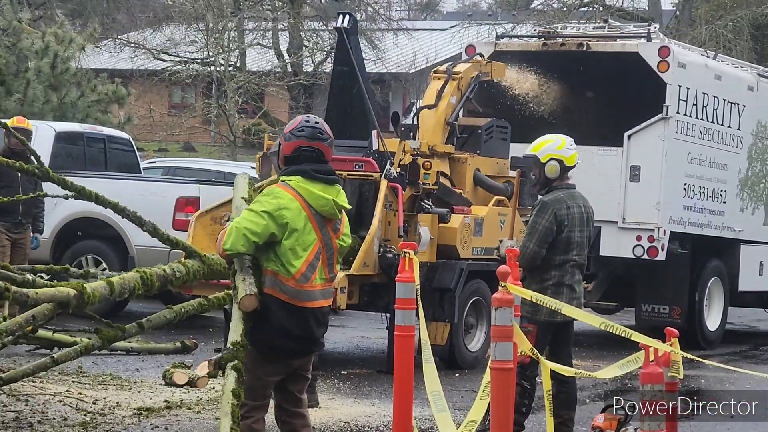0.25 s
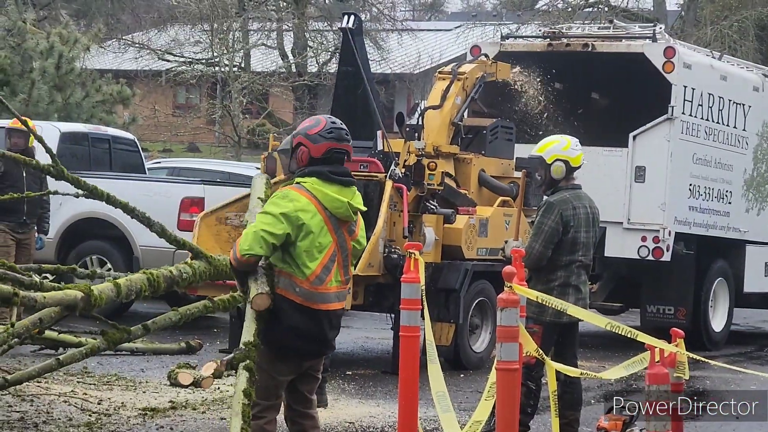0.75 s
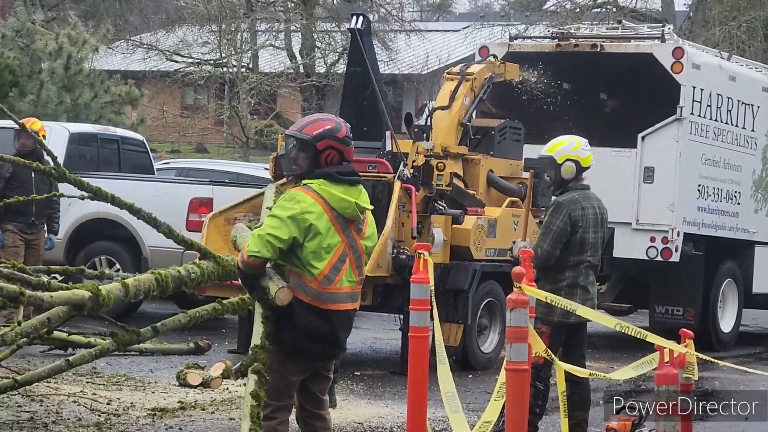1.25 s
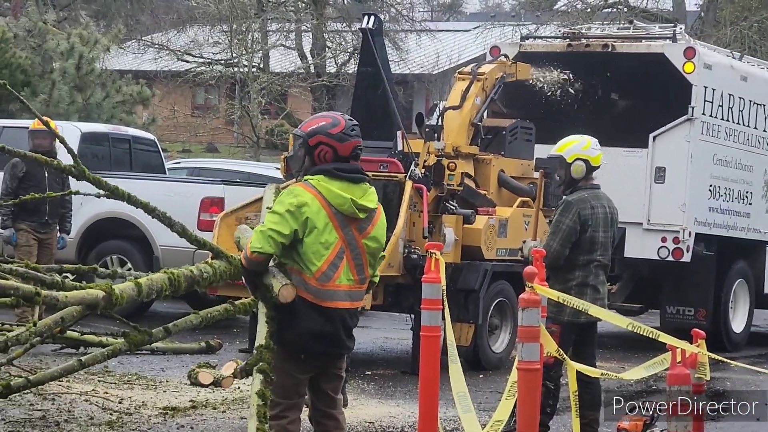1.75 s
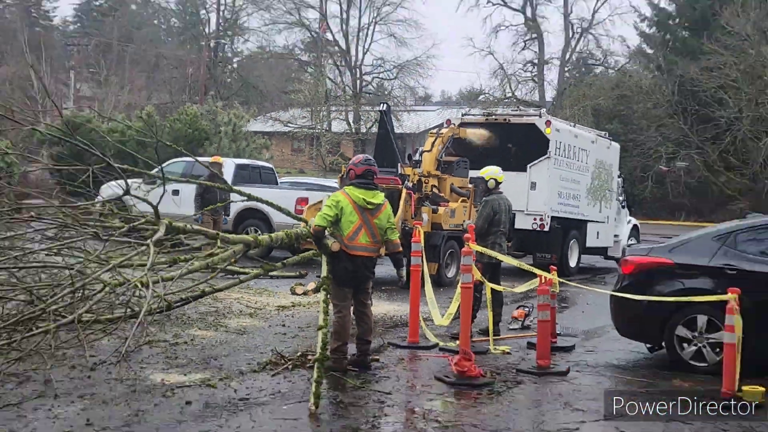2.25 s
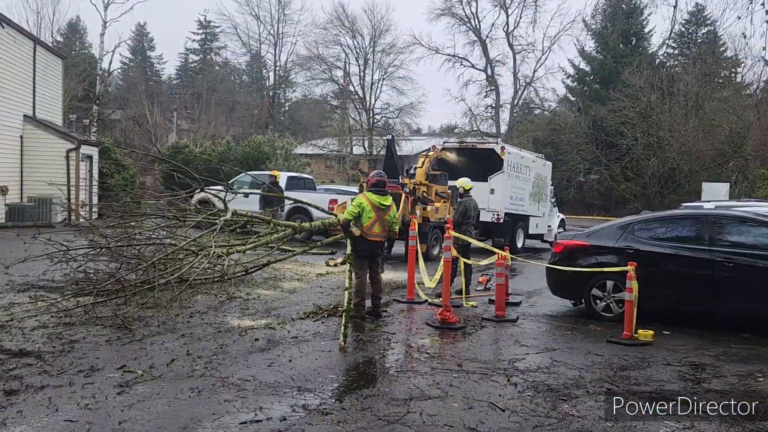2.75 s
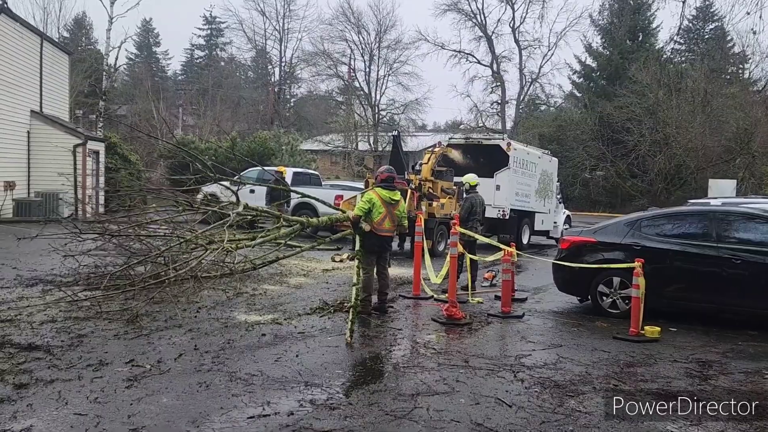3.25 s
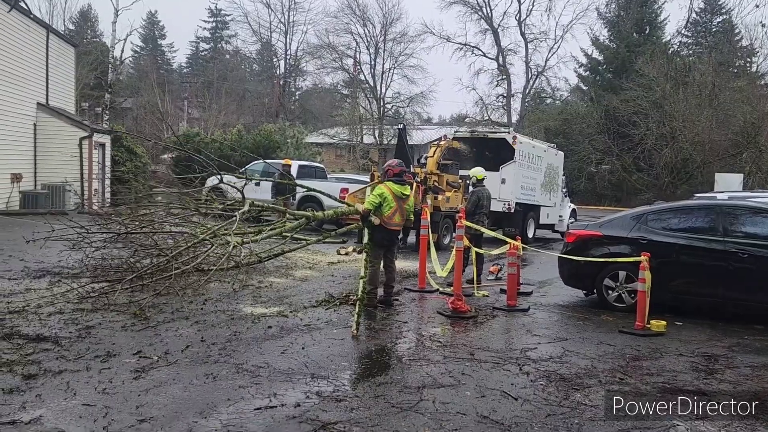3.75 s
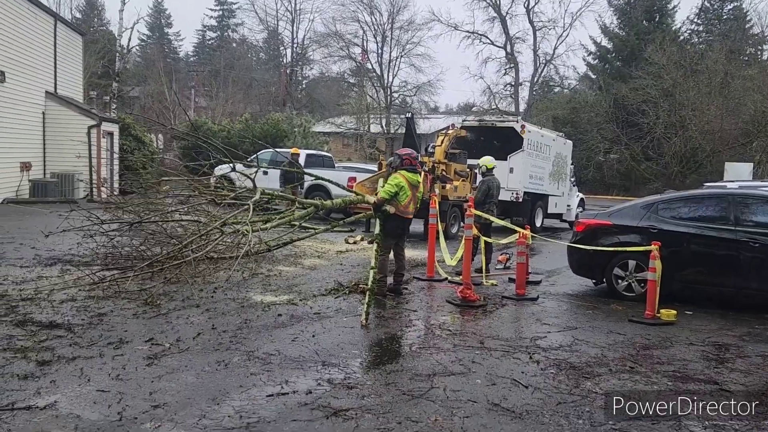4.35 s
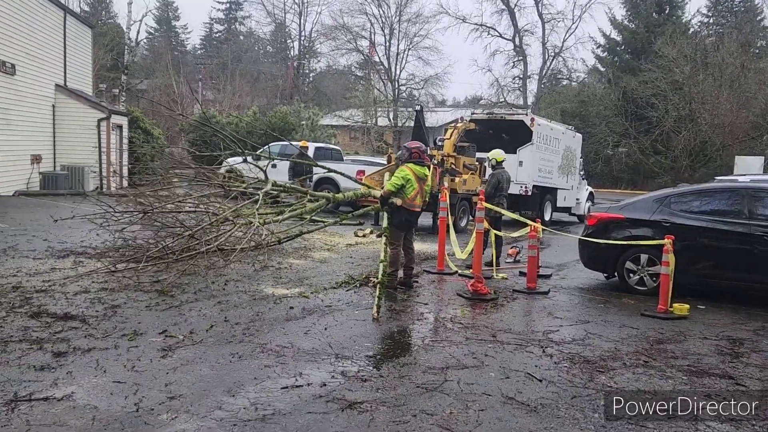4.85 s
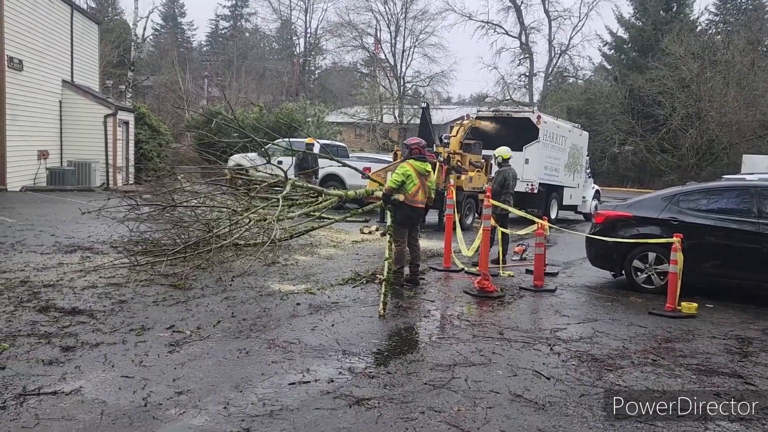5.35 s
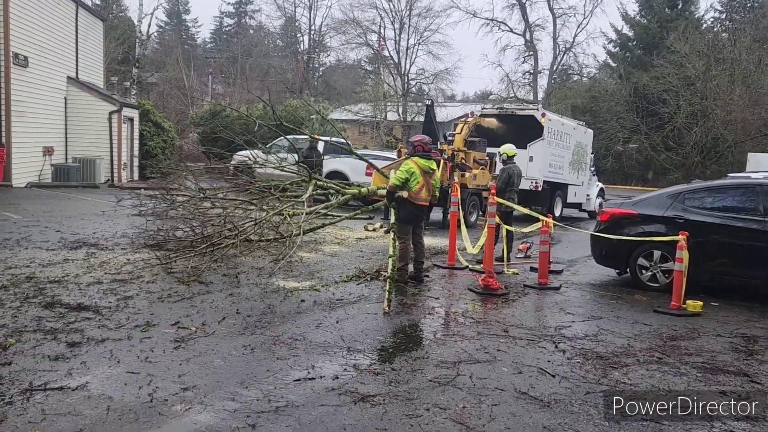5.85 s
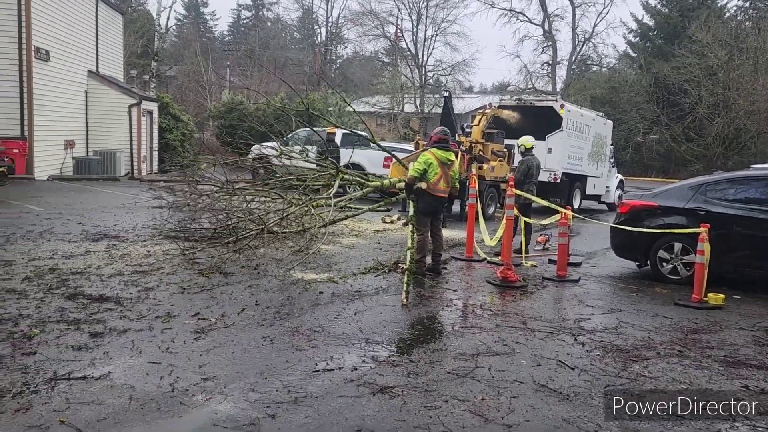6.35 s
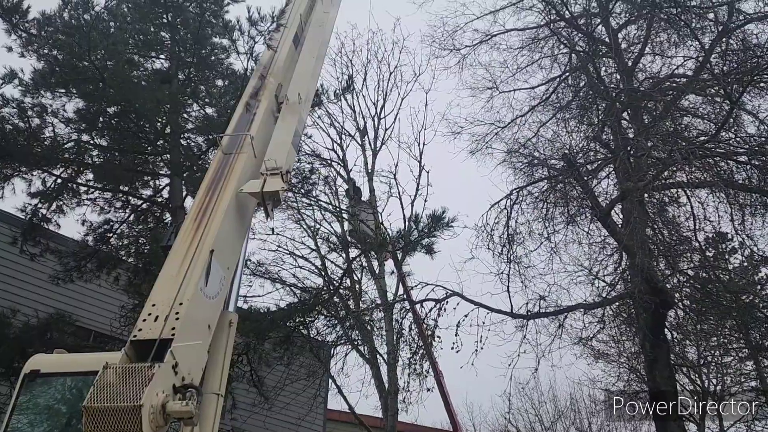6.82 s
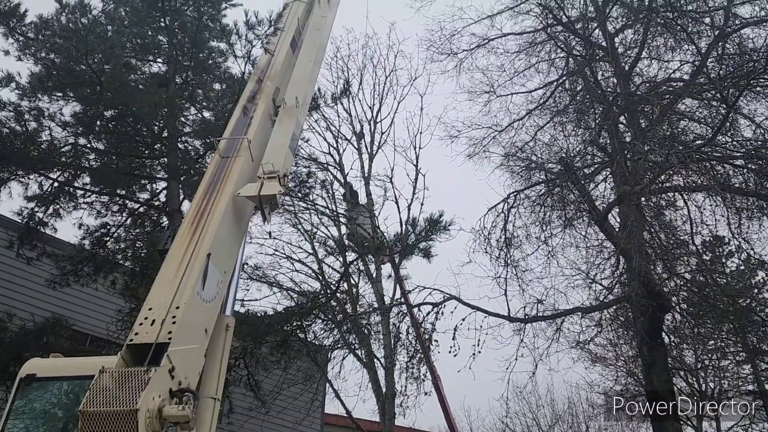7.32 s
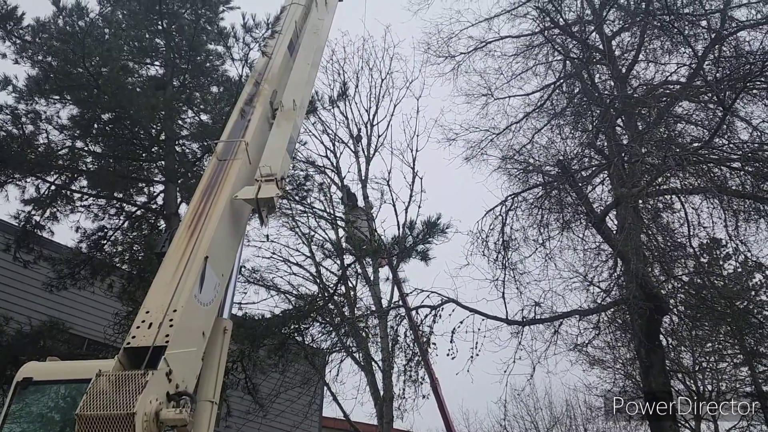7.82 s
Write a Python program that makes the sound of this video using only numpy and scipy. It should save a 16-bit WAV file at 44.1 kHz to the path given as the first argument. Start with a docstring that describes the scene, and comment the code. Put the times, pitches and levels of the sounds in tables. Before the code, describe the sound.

A close wood chipper is already biting a branch at 0 s, its droning engine near 46 Hz dipping slightly, then climbing steadily to about 59 Hz by 2.2 s. Short sticks buzz through, chips patter into the truck, and twigs crack, most sharply at 1.25 s, with small hollow log knocks at 0.64 and 1.25 s. Around 2.15-2.4 s the sound steps back to the open yard. A thick branch hits at 2.3 s: a hard rasping growl and bright splintering as the pitch sags until 3.1 s, then recovers, with snaps near 3.7 and 4.1 s. Another bite at 5.1 s drags it down until 6.4 s. It cuts at 6.57 s to 60 ms of silence. From 6.63 to 8 s a crane diesel runs close, slightly right, firing near 60 Hz, with block ringing strongest at first, clatter, low rumble and high hiss swelling around 6.65, 7.05 and 7.9 s.

```python
"""A drum chipper, already biting into a branch, gathers speed, then sags and recovers as more branches follow.
Engine orders drone and lope; knife blows ring the drum, noise bands rasp, splinter and spray into a truck,
and twigs snap. The sound starts close and widens to the yard at about 2.3 s. After a 60 ms silence a crane's
diesel knocks close by, off to the right: firing orders, a ringing block, clatter, rumble and swelling hiss."""
import sys
import numpy as np
from scipy import signal
from scipy.fft import rfft, irfft, next_fast_len
from scipy.io import wavfile

SR = 44100
rng = np.random.default_rng(int(sys.argv[2]) if len(sys.argv) > 2 else 0)


def digitize_waveform(pressure):
    """Quantize a signal to 16-bit integers and store it at the path in sys.argv[1].

    Rows of a 2-D input are taken as channels; values are limited to [-1, 1].
    """
    field = np.atleast_2d(pressure).T
    bounded = np.clip(field, -1, 1)
    quanta = np.round(bounded * 32767).astype(np.int16)
    wavfile.write(sys.argv[1], SR, quanta)


N = 356328
TIME = np.arange(N) / SR
CHIPPER_END_S, CRANE_START_S = 6.567, 6.627

# likeness of the two ears in the yard: (f/Hz, likeness 0-1)
YARD_LIKENESS = [(130, .99), (290, 0.97), (640, 0.47), (1400, 0.03), (15000, 0.16)]
# likeness of the two ears beside the crane: (f/Hz, likeness 0-1)
CRANE_LIKENESS = [(60, 0.96), (130, 1), (300, 0.29), (700, 1), (1400, 0.81), (3000, 0.26), (15000, 0.14)]


def chipper():
    """Engine and drum turn together; each knife blow thumps the drum, splits wood and flings chips."""
    # shaft speed, sagging in each cut and recovering after it: (t/s, f/Hz)
    shaft_speed = [(0, 47.32), (0.12, 45.87), (0.27, 45.42), (0.65, 48.71), (1.3, 53.6), (2, 58.06),
                   (2.19, 59.06), (2.3, 58.13), (2.75, 50.6), (3.1, 45.75), (3.95, 52.1), (4.65, 57.18),
                   (5.07, 59.5), (5.3, 56.2), (5.75, 51.6), (6.4, 45.8), (6.56, 46.65)]
    # tilt between the ears: (f/Hz, left minus right level/dB)
    yard_balance = [(60, 0.5), (110, 0.0), (200, 0.0), (380, 1), (700, 1.5), (1290, 2), (2380, 1.5),
                    (4400, -3.5), (8120, 7), (15000, 3)]
    # knife blows: (free level/dB, rise/(dB/Hz), steady cut level/dB, first bite level/dB, close gain/dB)
    knife_levels = (-34, 0.46, -24.5, -17, 5)
    # splitting wood: (free level/dB, rise/(dB/Hz), steady cut level/dB, first bite level/dB, close gain/dB)
    splinter_levels = (-40.5, 0.06, -36.5, -26.5, 6)
    widen_from_s, widen_to_s = 2.15, 2.38
    speed_hz, = curves(shaft_speed)
    turns = np.cumsum(speed_hz) / SR
    # 1 while the microphone is aimed closely at the chipper, 0 once it takes in the yard
    close = np.clip((widen_to_s - TIME) / (widen_to_s - widen_from_s), 0, 1)
    load, _, boom_change_db = branches()
    stick_knife, stick_splinter, stick_spray = sticks()
    knife = effort(knife_levels, speed_hz, close, stick_knife)
    splinter = effort(splinter_levels, speed_hz, close, stick_splinter)
    # the knives meet the wood at uneven moments
    clicks, bite = strokes(turns + .009 * wander(55), uneven_db=3.5, scatter_db=1.4, decay_s=.008)
    machine = engine_drone(speed_hz, turns, load, close) + engine_lope(speed_hz, turns, close)
    machine = machine + deep_boom(boom_change_db, close) + housing_rumble(speed_hz, close)
    machine = machine + drum_growl(clicks, knife) + whistle(speed_hz, load, close)
    wood = cutting_rasp(bite, knife) + splitting(bite, splinter) + hood_knocks(splinter)
    wood = wood + chip_spray(speed_hz, close, stick_spray) + snaps() + log_knocks()
    return place(machine + wood, yard_balance)


def engine_drone(speed_hz, turns, load, close):
    """Each shaft order swells and fades as it glides through the standing waves of pipe and yard."""
    # standing waves: (f/Hz, level/dB)
    pipe_waves = [(46, -30.5), (53, -39), (56, -36), (60, -29), (91, -20), (94.5, -34.5), (104, -22),
                  (110.5, -36), (116, -21), (137, -25.5), (145, -21.5), (155, -23.5), (160, -35),
                  (166, -23.5), (176, -23), (192, -31.5), (220, -19.5), (236, -22.5), (258, -21.5),
                  (280, -29.5), (296, -29.5)]
    # shaft orders 1 to 5: (level re standing wave/dB, change per unit load/dB, close gain/dB)
    shaft_orders = [(1.5, -13, 1), (-2, 0.5, 7), (-0.5, 0.5, 6), (1.5, 2, 2), (-2.5, 1, -2)]
    wave_hz, wave_db = np.transpose(pipe_waves)
    orders_db = []
    for k, (db, load_db, close_db) in enumerate(shaft_orders, 1):
        standing_db = np.interp(k * speed_hz, wave_hz, wave_db)
        orders_db.append(standing_db + db + load_db * load + close_db * close)
    return exhaust(turns, orders_db, flutter_db=1.1, flutter_rate=18, lag_turns=.03)


def engine_lope(speed_hz, turns, close):
    """Unequal knife cuts make the engine lope under load, heard as fluttering half orders of the shaft."""
    # half orders: (shaft order, relative level/dB)
    half_orders = [(2.5, -3), (3.5, -5.5), (4.5, -5.5), (5.5, -15.5), (6.5, -27)]
    # lope: (free level/dB, rise/(dB/Hz), steady cut level/dB, first bite level/dB, close gain/dB)
    lope_levels = (-48, 3, -25.5, -37, 4.5)
    tones = 0
    for order, db in half_orders:
        phase = 2 * np.pi * (order * turns + rng.random())
        tones = tones + undb(db + 5.4 * wander(13)) * np.sin(phase)
    return effort(lope_levels, speed_hz, close) * np.sqrt(2) * tones


def deep_boom(change_db, close):
    """Low noise in resonant bands, which dips while a branch is cut and is stronger close up."""
    # boom spectrum: (f/Hz, level/dB)
    boom_bands = [(18, -71), (30, -41), (42, -13), (56, -18), (69, 1), (84, -8), (110, -6.5), (170, -60)]
    return undb(-28.5 + change_db + 6 * close) * tint(YARD_LIKENESS, boom_bands)


def housing_rumble(speed_hz, close):
    """The housing rumbles as a low-mid noise band that grows with the work."""
    # housing spectrum: (f/Hz, level/dB)
    housing_bands = [(55, -27), (90, -5.5), (130, 8), (190, 5.5), (260, -1), (340, -5.5), (600, -51.5)]
    # housing, trimmed below: (free level/dB, rise/(dB/Hz), steady cut level/dB, first bite level/dB, close gain/dB)
    housing_levels = (-19, 0.02, -23, -12, 4.5)
    return undb(-6.5) * effort(housing_levels, speed_hz, close) * tint(YARD_LIKENESS, housing_bands)


def drum_growl(clicks, knife):
    """Knife blows ring the steel drum and run together into a growl."""
    # drum spectrum: (f/Hz, level/dB)
    drum_bands = [(20, -85), (70, -46), (130, 8.5), (220, 4), (320, -2), (430, 1), (560, -5.5), (780, -5),
                  (950, -12), (1400, -42)]
    return undb(2.5) * knife * ring(clicks, drum_bands, .017, YARD_LIKENESS)


def cutting_rasp(bite, knife):
    """The cut itself rasps: noise that surges with each knife blow over a steady floor."""
    # cutting spectrum: (f/Hz, level/dB)
    cutting_bands = [(180, -16.5), (300, -0.5), (376, -7.5), (431, 0), (630, -7), (791, -7.5),
                     (1100, -15.5), (1300, -12.5), (1690, -45.5), (2860, -120)]
    return undb(-4) * knife * tint(YARD_LIKENESS, cutting_bands, bite + 2)


def splitting(bite, splinter):
    """Wood splits in ragged bursts: bright noise pulsed by the blows and roughened at random."""
    # splintering spectrum: (f/Hz, level/dB)
    splinter_bands = [(560, -23.5), (950, -3), (1150, -8), (1450, 0.5), (1740, -4), (2020, -1.5),
                      (2340, -4), (2540, -7.5), (3020, -7.5), (3230, -11), (3510, -7), (3760, -17.5),
                      (4200, -14), (5460, -32), (9240, -120)]
    ragged = (bite + 7) * undb(0.36 * wander(160) + 0.3 * wander(30))
    return undb(3.5) * splinter * tint(YARD_LIKENESS, splinter_bands, ragged)


def hood_knocks(splinter, rate=280, scatter_db=2, size=4096):
    """Lumps of wood hit the hood at random; each hit wakes its resonances in a different mix."""
    # resonances of the steel hood: (f/Hz, width/Hz, level/dB)
    hood_modes = [(1458, 102, 3), (1740, 210, -12), (2325, 12, 0.5), (2700, 41, -19), (3050, 14, -0.5),
                  (3520, 185, -6), (4100, 93, -5), (4840, 120, -6.5)]
    strengths = undb(scatter_db * np.clip(rng.standard_normal(N), -2, 1))
    hits = (rng.random(N) < rate / SR) * strengths
    out, t = 0, TIME[:size]
    for hz, width_hz, db in hood_modes:
        mode = np.exp(-np.pi * width_hz * t) * np.sin(2 * np.pi * (hz * t + rng.random((2, 1))))
        mixed_hits = hits * (rng.random(N) - .5)
        rung = signal.oaconvolve([mixed_hits], mode, axes=1)[:, :N]
        out = out + undb(db) * np.sqrt(width_hz) * unit(rung)
    return undb(-3.5) * splinter * unit(out)


def chip_spray(speed_hz, close, stick_spray):
    """Chips patter densely on the truck's box: high noise with fast random flicker, late by their flight."""
    # spray spectrum: (f/Hz, level/dB)
    spray_bands = [(1760, -11.5), (3000, -6), (3190, -6.5), (3830, -1), (4220, 1.5), (5120, 0), (5380, 3),
                   (5850, 0), (7410, 1), (8630, -3.5), (9780, -17), (11700, -10.5), (14600, -13),
                   (15400, -38), (15800, -19)]
    # spray: (free level/dB, rise/(dB/Hz), steady cut level/dB, first bite level/dB, close gain/dB)
    spray_levels = (-41.5, -0.15, -31.5, -32, 2.5)
    # the flight delays the chips of branches only
    chips = effort(spray_levels, speed_hz, close, stick_spray, delay_s=0.028)
    patter = undb(1.3 * wander(900) + 1.05 * wander(70))
    return undb(1.0) * chips * tint(YARD_LIKENESS, spray_bands, patter)


def snaps(size=11025):
    """Each twig breaks with a crack of noise and a fainter, slower tail from the truck and the houses."""
    # twigs snapping: (t/s, approximate peak level/dB, decay/s, brightness/dB)
    twig_breaks = [(0.368, -11, 0.0092, -10), (0.514, -13.5, 0.017, -16.5), (0.915, -12.5, 0.012, -14),
                   (1.2525, -2.5, 0.0089, -13.5), (1.28, -15, 0.011, -14), (1.5242, -8.5, 0.023, -42),
                   (1.579, -9.5, 0.013, -4), (1.6886, -7.5, 0.0083, -14), (1.8011, -13, 0.0097, -33),
                   (2.1703, -6.5, 0.012, -28), (2.9813, -13, 0.01, -2), (3.1953, -18, 0.016, -8),
                   (3.405, -19, 0.011, 1), (3.708, -11.5, 0.025, -10.5), (3.76, -22, 0.012, -9),
                   (3.9858, -21, 0.0067, 2), (4.0971, -7, 0.011, -8.5), (4.2223, -22, 0.012, 0),
                   (5.139, -10, 0.012, -3)]
    # twig spectrum before the brightness tilt: (f/Hz, level/dB)
    twig_bands = [(500, -8.5), (1200, -8), (1450, 4), (1700, 0), (2750, -6), (3080, 3), (3400, -3.5),
                  (4400, -4), (4750, -4.5), (5100, -13), (5450, -3.5), (5900, -10), (7500, -12),
                  (9500, -32), (15000, -46)]
    out, t = np.zeros((2, N + size)), TIME[:size]
    for s, db, decay_s, bright_db in twig_breaks:
        tails = np.exp(-t / max(decay_s, .002)) + undb(-8) * np.exp(-t / 0.038)
        shape = (1 - np.exp(-t / 0.0002)) * tails
        # tilt about 2.5 kHz; a brightness of -12 dB leaves the spectrum as it is
        spectrum = [(hz, d + (bright_db + 12) * np.clip(np.log2(hz / 2500), -1, 1)) for hz, d in twig_bands]
        start = int(s * SR)
        # rms sits 12 dB below the intended peak
        crack = undb(db - 12) * shape * unit(colour(noise(YARD_LIKENESS, size), spectrum))
        out[:, start:start + size] += crack
    return out[:, :N]


def log_knocks():
    """Logs knock on the feed tray, one hollow, quickly damped note each."""
    # knocks: (t/s, f/Hz, peak level/dB, decay/s)
    tray_knocks = [(0.636, 329, -23, 0.027), (1.255, 564, -19, 0.041)]
    return sum(undb(db) * gate(s, s, 0.0035, decay_s) * np.sin(2 * np.pi * hz * (TIME - s))
               for s, hz, db, decay_s in tray_knocks)


def whistle(speed_hz, load, close):
    """A thin, unsteady whistle at 13.95 kHz, heard at speed and gone while a branch is cut."""
    whistle_hz, width_hz, from_speed_hz = 13950, 220, 48.5
    on = np.clip(speed_hz - from_speed_hz, 0, 1) * np.clip(1 - load, 0, 1)
    carrier = np.sin(2 * np.pi * whistle_hz * TIME)
    ears = np.array([unit(wander(width_hz) * carrier) for _ in range(2)])
    return undb(-62 + 4 * close) * on * ears


def branches(delay_s=0):
    """Thick branches get a hard first bite, then a steady cut: steady and first envelopes, boom change in dB."""
    # branches: (bite t/s, end t/s, first bite level/dB, bite decay/s, steady cut level/dB, boom change/dB)
    branch_cuts = [(0.03, 0.143, -5.5, 0.23, -5, -1), (2.27, 3.062, -3.5, 0.13, 1, -6),
                   (5.1, 6.392, -2.5, 0.2, -1, -2.5)]
    attack_s, release_s = 0.093, 0.095
    steady, first, boom_db = 0, 0, 0
    for s, end_s, first_db, decay_s, steady_db, change_db in branch_cuts:
        in_drum = gate(s + delay_s, end_s + delay_s, attack_s, release_s)
        steady = steady + undb(steady_db) * in_drum
        first = first + undb(first_db) * gate(s + delay_s, s + delay_s, attack_s, decay_s)
        boom_db = boom_db + change_db * in_drum
    return steady, first, boom_db


def sticks():
    """Thin sticks and branch ends pass in short bursts: envelopes of knife blows, splintering and spray."""
    # sticks: (t/s, length/s, knife blow level/dB, splintering level/dB, spray level/dB)
    stick_cuts = [(0.356, 0.036, -38, -39, -47), (0.966, 0.05, -31, -42, -52),
                  (1.254, 0.027, -30, -36, -50), (1.388, 0.033, -33.5, -50, -48),
                  (1.532, 0.09, -34, -31.5, -37.5), (1.666, 0.088, -30.5, -34, -39),
                  (1.774, 0.054, -27, -31, -36.5), (1.883, 0.23, -34, -44.5, -43),
                  (2.81, 0.17, -24.5, -39.5, -43), (3.306, 0.1, -50, -52, -42.5),
                  (3.73, 0.048, -32, -38.5, -34), (4.13, 0.1, -51, -44, -40),
                  (5.116, 0.19, -34, -38.5, -28.5), (6.33, 0.076, -39, -35.5, -36)]
    attack_s, release_s = 0.026, 0.047
    return sum(undb(levels_db)[:, None] * gate(s + attack_s, s + length_s, attack_s, release_s)
               for s, length_s, *levels_db in stick_cuts)


def effort(levels_db, speed_hz, close, stick=0, delay_s=0):
    """Gain of one sound of the chipper: free running, branches and sticks add in power."""
    free_db, db_per_hz, steady_db, first_db, close_db = levels_db
    steady, first, _ = branches(delay_s)
    # the free level holds at a shaft speed of 52 Hz
    free = undb(free_db + db_per_hz * (speed_hz - 52))
    power = free ** 2 + (undb(steady_db) * steady) ** 2 + (undb(first_db) * first) ** 2 + stick ** 2
    return undb(close_db * close) * np.sqrt(power)


def crane(lag_s=.0004):
    """Each diesel firing rings the block and sets off clatter; the sound reaches the left ear late."""
    # firing rate, creeping up to speed: (t/s, f/Hz)
    firing_rate = [(6.64, 58.78), (7, 59.36), (7.3, 60.12), (8.05, 60.75)]
    # tilt between the ears: (f/Hz, left minus right level/dB)
    crane_tilt = [(60, -3.5), (110, 1.5), (200, -1.5), (380, -1), (700, -1.0), (1290, -0.5), (2380, 6),
                  (4400, -10.5), (8120, 8), (15000, 1.5)]
    firing_hz, = curves(firing_rate)
    turns = np.cumsum(firing_hz) / SR
    _, knock = strokes(turns, uneven_db=3.5, scatter_db=1.8, decay_s=.005)
    engine = crane_drone(firing_hz, turns) + engine_block(turns) + engine_mounts(turns)
    surface = clatter(knock) + hiss(knock) + crane_rumble()
    left, right = place(engine + surface, crane_tilt)
    return np.array([np.roll(left, int(lag_s * SR)), right])


def crane_drone(firing_hz, turns):
    """Firing orders change with the engine's pace; a panel hums when an order nears its pitch."""
    # firing orders 1 to 7: (level at 60 Hz/dB, rise/(dB/Hz of firing rate))
    firing_orders = [(-33, 2), (-22, -4.2), (-23, 3.7), (-25.5, -6), (-35.5, 11), (-39.5, 2.5), (-38.5, 3)]
    panel_hz, panel_width_hz, panel_db = 361, 8, 15
    orders_db = []
    for k, (db, db_per_hz) in enumerate(firing_orders, 1):
        hum_db = panel_db * np.exp(-((k * firing_hz - panel_hz) / panel_width_hz) ** 2)
        orders_db.append(db + db_per_hz * (firing_hz - 60) + hum_db)
    return exhaust(turns, orders_db, flutter_db=1.1, flutter_rate=14, lag_turns=.035)


def engine_block(turns):
    """Firings ring the block, hardest at first; early and late ignition blurs the highest harmonics."""
    # block spectrum: (f/Hz, level/dB)
    block_bands = [(20, -62), (330, -9), (460, -14), (530, 2), (600, 1.5), (700, -2), (800, 4), (1000, -2),
                   (1350, 3), (1700, -15), (2600, -29.5)]
    clicks, _ = strokes(turns + .008 * wander(60), uneven_db=3.5, scatter_db=1.4, decay_s=.005)
    # 8 dB stronger at the start, settling with a time constant of 0.25 s
    level_db = -26.5 + 8 * np.exp(-np.maximum(TIME - CRANE_START_S, 0) / 0.25)
    return undb(level_db) * ring(clicks, block_bands, .013, CRANE_LIKENESS)


def engine_mounts(turns):
    """The engine rocks to and fro on its mounts, once in two firings, as pulses of opposite sign."""
    # mount spectrum: (f/Hz, level/dB)
    mount_bands = [(20, -51), (50, -19), (88, -11), (150, -3), (210, -11), (270, -7.5), (330, -5),
                   (450, -5), (800, -40)]
    rocking = np.diff(np.floor(turns) % 2, prepend=0) * undb(5.4 * wander(25))
    return undb(-28.5) * ring(rocking, mount_bands, 0.0063, CRANE_LIKENESS)


def clatter(knock):
    """Noise bursts rattle at every firing over a steady floor."""
    # clatter spectrum: (f/Hz, level/dB)
    clatter_bands = [(250, -19), (600, -9), (1050, -1.5), (1400, 1), (1900, -5.5), (2600, -4), (3300, -14),
                     (4300, -15), (5500, -9.5), (7000, -17.5), (8200, -12.5), (10000, -50), (13000, -55)]
    # clatter over time, raised 6.5 dB below: (t/s, level/dB)
    clatter_course = [(6.66, -27), (6.838, -24.5), (7.134, -30), (7.576, -26), (8.052, -28.5), (8.06, -28)]
    level_db, = curves(clatter_course)
    rattle = (knock + 1.35) * undb(1.2 * wander(400))
    return undb(level_db + 6.5) * tint(CRANE_LIKENESS, clatter_bands, rattle)


def hiss(knock):
    """A high hiss, faintly pulsed by the firings, swells and fades over a quiet floor."""
    # hiss spectrum: (f/Hz, level/dB)
    hiss_bands = [(9000, 0), (11000, -10), (12200, 1), (15800, -3)]
    # swells: (full at t/s, until t/s, level/dB)
    hiss_swells = [(6.63, 6.9, -25), (7.0, 7.11, -23.5), (7.805, 8.01, -24.5)]
    swells = [undb(db) * gate(s, end_s, 0.22, 0.067) for s, end_s, db in hiss_swells]
    level = np.hypot(np.max(swells, axis=0), undb(-40))
    return level * tint(CRANE_LIKENESS, hiss_bands, knock + 4)


def crane_rumble():
    """A steady bed of low noise under the diesel."""
    # rumble spectrum: (f/Hz, level/dB)
    rumble_bands = [(25, -21), (48, -6), (90, 0.5), (200, 2), (330, -4), (500, -18), (900, -54)]
    return undb(-21.5) * tint(CRANE_LIKENESS, rumble_bands)


def exhaust(turns, orders_db, flutter_db, flutter_rate, lag_turns):
    """The pipe sounds the orders of the engine; each flutters, and the higher ones leave it later."""
    out = 0
    for k, db in enumerate(orders_db, 1):
        gain = np.sqrt(2) * undb(db + flutter_db * wander(flutter_rate))
        out = out - gain * np.cos(2 * np.pi * k * (turns - lag_turns * k))
    return out


def strokes(turns, uneven_db, scatter_db, decay_s):
    """One blow a turn, strong and weak alternately: the clicks, and the envelope that dies away after each."""
    count = np.floor(np.maximum.accumulate(np.abs(turns))).astype(int)
    starts = np.flatnonzero(np.diff(count, prepend=-1))
    scatter = scatter_db * rng.standard_normal(1024)[count]
    sizes = undb(uneven_db * (count % 2 - .5) + scatter)
    clicks = np.zeros(N)
    clicks[starts] = sizes[starts]
    since_blow_s = TIME - TIME[starts][count]
    return clicks, unit(sizes * np.exp(-since_blow_s / decay_s))


def ring(clicks, spectrum, decay_s, likeness, size=4096):
    """A steel body with closely packed modes smears each click but passes every harmonic."""
    modes = rfft(noise(likeness, size) * np.exp(-TIME[:size] / decay_s))
    # keep the phases only, so that the body itself has a flat response
    body = np.roll(irfft(modes / np.abs(modes)), size // 16, axis=1)
    smeared = signal.oaconvolve(clicks[None], body, axes=1)[:, :N]
    return unit(colour(smeared, spectrum))


def gate(start_s, end_s, attack_s, release_s):
    """Swells up to start_s, holds until end_s, then dies away."""
    rise = (np.minimum(TIME - start_s, 0) / attack_s) ** 2
    fall = np.maximum(TIME - end_s, 0) / release_s
    return np.exp(-rise - fall)


def tint(likeness, spectrum, envelope=1):
    """Two-ear noise shaped in time, then in frequency, at rms 1."""
    return unit(colour(noise(likeness) * envelope, spectrum))


def noise(likeness, size=N):
    """White noise for two ears, alike to the given degree at each frequency."""
    padded = 2 * next_fast_len(size // 2 + 1, real=True)
    alike = np.clip(over_bins(likeness, padded), 0, 1)
    mid, side = rfft(rng.standard_normal((2, padded))) * np.sqrt([(1 + alike) / 2, (1 - alike) / 2])
    return irfft([mid + side, mid - side])[:, :size]


def colour(x, spectrum, size=8192):
    """Causal minimum-phase filter with the given (f/Hz, level/dB) response."""
    # folding the cepstrum onto positive time gives minimum phase
    cepstrum = irfft(np.log(undb(over_bins(spectrum, size))))
    cepstrum[1:size // 2] *= 2
    cepstrum[size // 2 + 1:] = 0
    response = irfft(np.exp(rfft(cepstrum)))[:size // 2]
    filtered = signal.oaconvolve(np.atleast_2d(x), response[None], axes=1)
    return filtered[:, :x.shape[-1]].reshape(x.shape)


def place(x, balance):
    """Tilt each band towards the left or the right."""
    return np.array([colour(ear, [(hz, sign * db / 2) for hz, db in balance]) for ear, sign in zip(x, (1, -1))])


def wander(rate):
    """Random values at rms 1, drawn rate times a second and joined by straight lines."""
    return unit(np.interp(TIME * rate, np.arange(16384), rng.standard_normal(16384)))


def curves(table):
    """The columns of a table, joined by straight lines in time."""
    s, *columns = np.transpose(table)
    return [np.interp(TIME, s, column) for column in columns]


def over_bins(points, size):
    """(f/Hz, value) points spread over the bins of a spectrum, straight on a log frequency axis."""
    hz, value = np.transpose(points)
    bins_hz = np.maximum(np.fft.rfftfreq(size, 1 / SR), 1)
    return np.interp(np.log(bins_hz), np.log(hz), value)


def undb(db):
    """Decibels to gain."""
    return 10 ** (np.asarray(db) / 20)


def unit(x):
    """Scale to rms 1."""
    return x / np.sqrt(np.mean(x ** 2))


def scene():
    """The chipper, a short silence, then the crane."""
    fade_s = .004
    chipper_on = np.clip((CHIPPER_END_S - TIME) / fade_s, 0, 1)
    crane_on = np.clip((TIME - CRANE_START_S) / fade_s, 0, 1)
    return chipper() * chipper_on + crane() * crane_on


def record(dry):
    """Clip the peaks at full scale, then cut steeply above 15.8 kHz."""
    low_pass = signal.ellip(10, .2, 80, 15800, fs=SR, output="sos")
    return signal.sosfilt(low_pass, np.clip(dry, -1, 1))


dry = scene()
out = record(dry)
digitize_waveform(out)
```